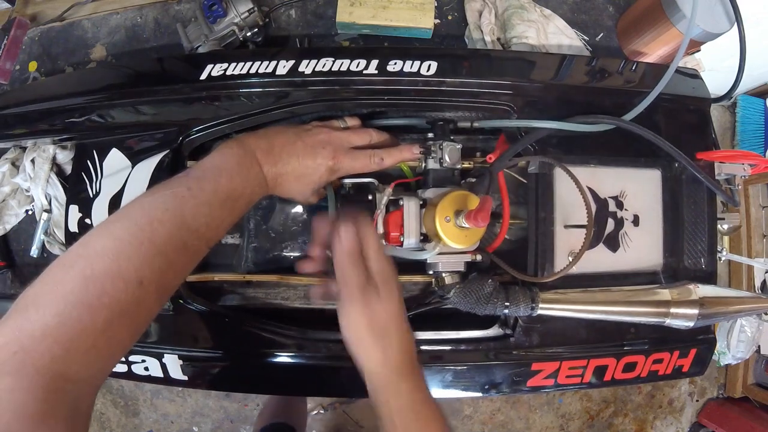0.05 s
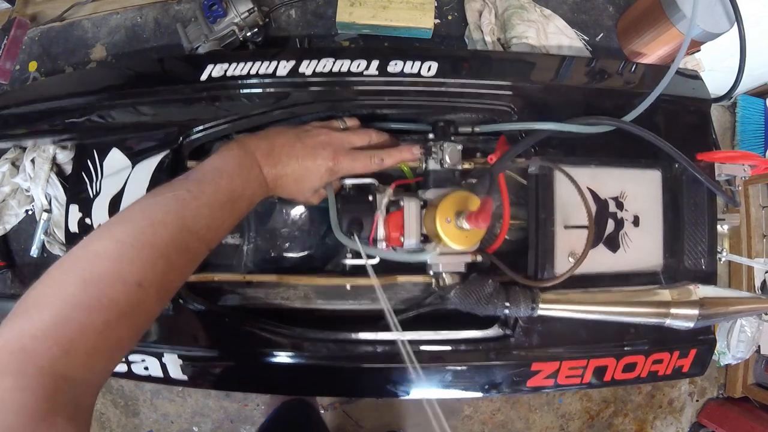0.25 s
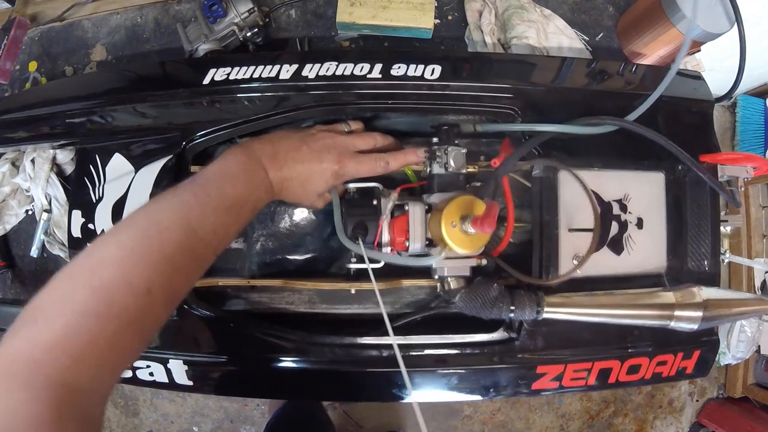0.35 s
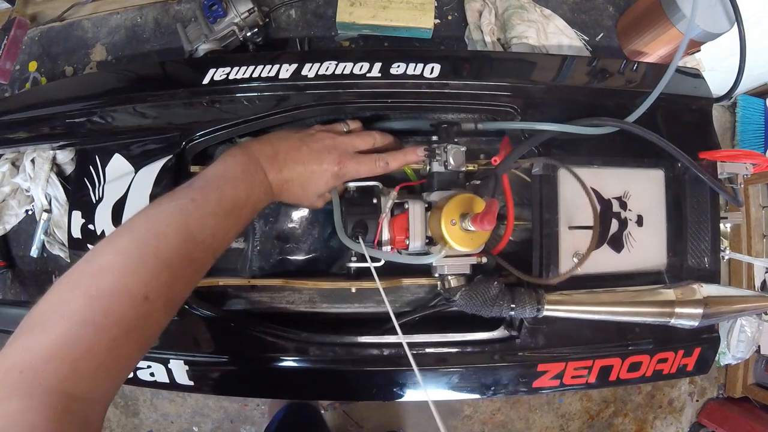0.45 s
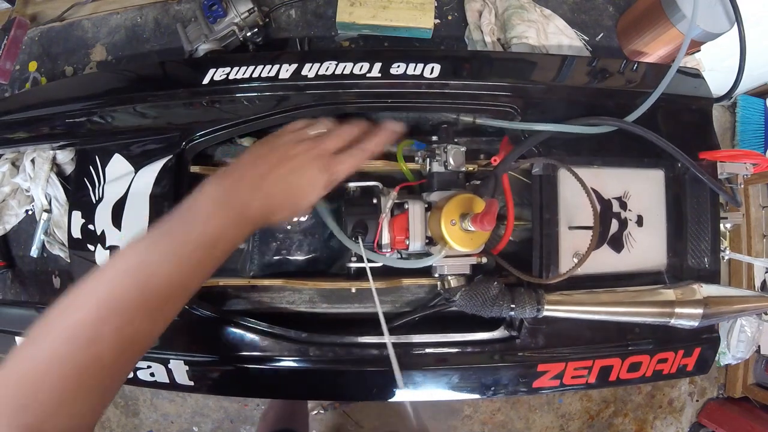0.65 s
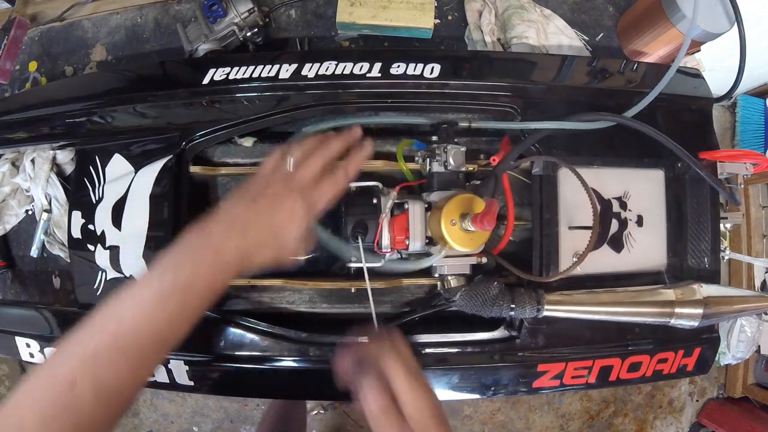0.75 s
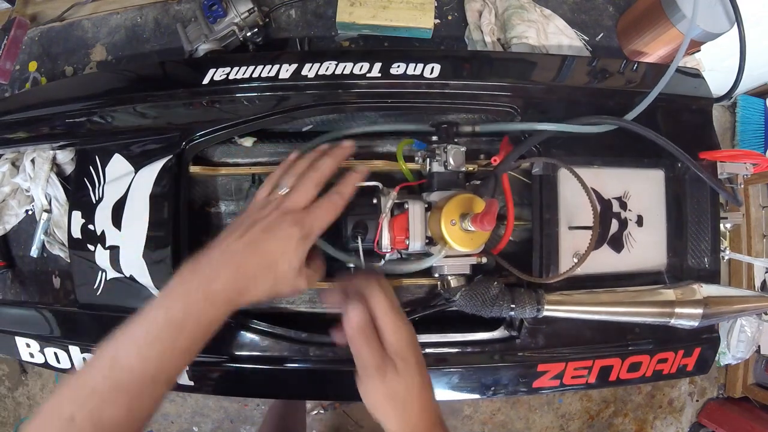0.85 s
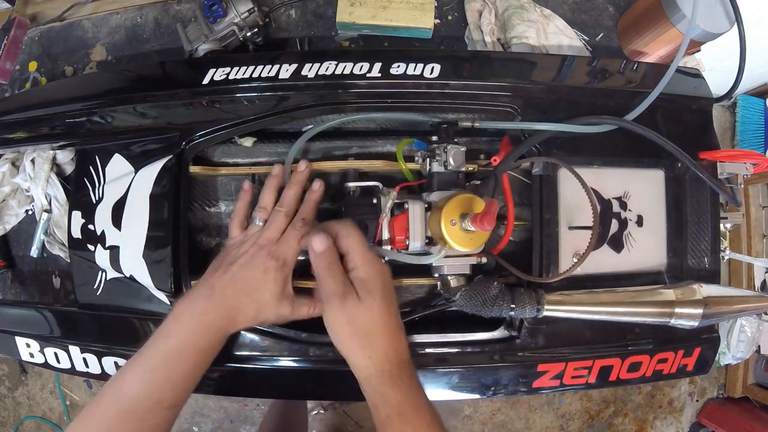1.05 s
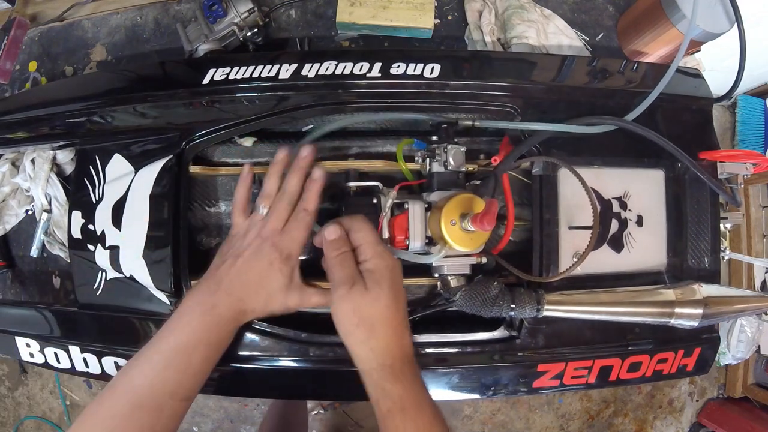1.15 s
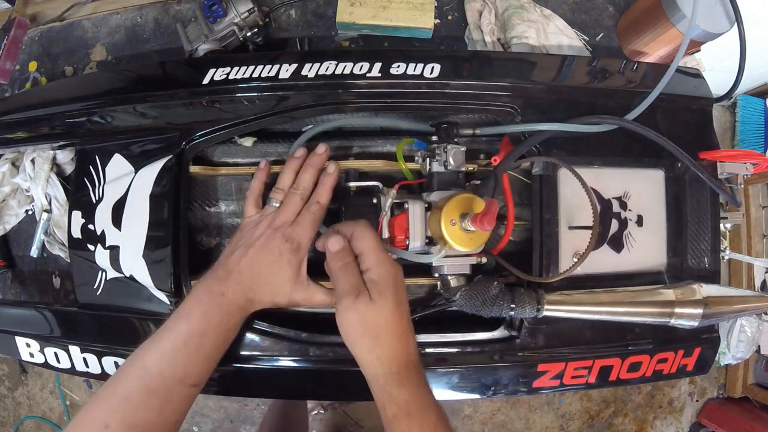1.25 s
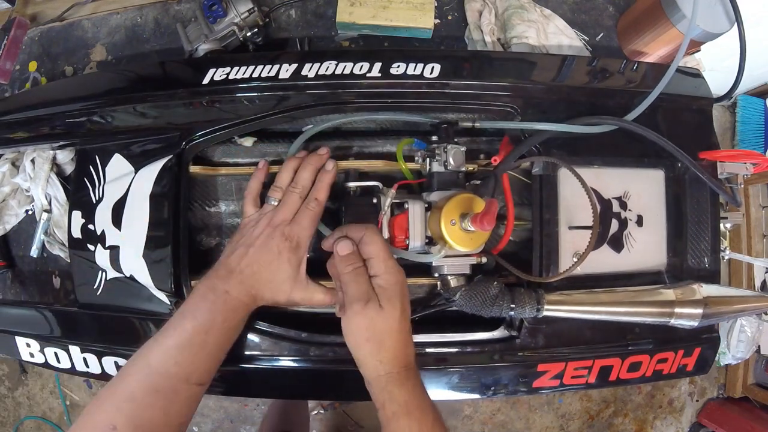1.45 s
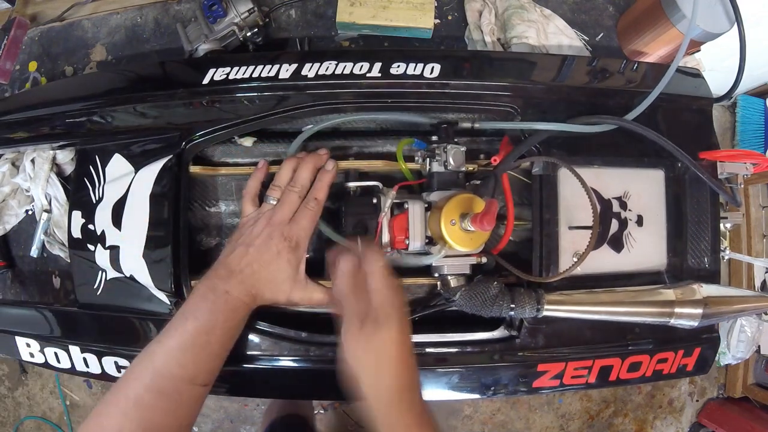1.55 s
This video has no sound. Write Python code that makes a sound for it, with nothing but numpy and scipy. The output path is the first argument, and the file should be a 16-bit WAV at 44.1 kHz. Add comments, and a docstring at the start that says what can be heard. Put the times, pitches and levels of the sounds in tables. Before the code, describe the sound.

One rattling pull of a model boat's starter cord, then ticking as it rewinds.

```python
"""Starter cord pull on a model boat.

A small two-stroke engine turns over once without firing. Compression strokes thump the hull, loose parts
rattle, the pawl ticks ever slower as the cord winds back, hands rub and knock. Mains hum and room rumble
stand behind. The camera housing rings near 6.5 kHz and sharpens every tick."""
import sys
import numpy as np
from scipy import signal
from scipy.fft import rfft, irfft
from scipy.io import wavfile
from scipy.ndimage import uniform_filter1d

SR = 44100
rng = np.random.default_rng(int(sys.argv[2]) if len(sys.argv) > 2 else 0)


def output_pcm(signal):
    """Save a mono or channel-first signal as 16-bit PCM at the path in sys.argv[1].

    Samples are clipped to [-1, 1] before scaling.
    """
    pcm = np.clip(np.atleast_2d(signal).T, -1, 1) * 32767
    wavfile.write(sys.argv[1], SR, np.round(pcm).astype(np.int16))


N = 70560
T = np.arange(N) / SR

# mains hum (time [s], level [dB])
HUM_LEVEL = [(0, -47), (.5, -46), (1.1, -45.5), (1.6, -43.5)]
# room noise spectrum (frequency [Hz], gain [dB])
ROOM_SPECTRUM = [(20, -1), (45, 8.5), (75, 0.5), (100, -3.5), (300, -13.5), (1000, -25.5), (3000, -28),
                 (4600, -51), (8000, -37), (12500, -39)]
# hands and cord sliding (time [s], level [dB])
RUSTLE_LEVEL = [(0, -50.5), (.03, -71), (.06, -62), (.08, -48.5), (.12, -70.5), (.17, -66), (.32, -49),
                (.5, -56), (.68, -60.5), (.8, -55.5), (.85, -66.5), (.97, -79), (1.0, -61.5), (1.03, -76),
                (1.11, -79), (1.145, -59), (1.165, -72), (1.19, -57), (1.225, -70.5), (1.255, -58.5),
                (1.29, -73.5), (1.6, -72)]
# sliding spectrum (frequency [Hz], gain [dB])
RUSTLE_SPECTRUM = [(200, 14), (600, 12), (1500, 8.5), (2700, 1.5), (4600, -3), (6400, -10), (9500, -3.5),
                   (12500, -48)]
# pawl ticks (time [s], level through housing [dB], scrape length [s])
PAWL_TICKS = [(0.024, -30.5, 0.02), (0.064, -31, 0.015), (0.083, -32, 0.0053), (0.153, -24, 0.0019),
              (0.164, -8.5, 0.0041), (0.204, -26, 0.0044), (0.248, -15.5, 0.0048), (0.254, -36, 0.0032),
              (0.28, -7, 0.0044), (0.294, -8, 0.0054), (.303, -11.5, 0.0037), (0.323, -10, 0.0047),
              (0.33, -4, 0.002), (0.338, -34, .004), (0.378, -33, 0.0037), (0.429, -23, 0.012),
              (.458, -19.5, 0.0052), (0.471, -23.5, 0.01), (0.485, -20.5, 0.0088), (0.4984, -13.5, 0.0015),
              (.515, -22, .003), (0.529, -20, 0.005), (.549, -15, 0.0025), (0.5677, -21.5, 0.0064),
              (0.59, -19, 0.0036), (0.61, -20, 0.004), (0.633, -20.5, 0.007), (.662, -22.5, 0.0082),
              (0.6924, -20.5, 0.0052), (0.7253, -24, 0.011), (0.761, -22.5, 0.0082), (0.782, -31, 0.0017),
              (0.8133, -22, 0.0057), (0.8778, -22.5, 0.0069), (0.884, -38, .002), (0.965, -39, .002),
              (1.252, -40, 0.0017), (1.594, -24, 0.0037)]
# tick spectrum (frequency [Hz], gain [dB])
TICK_SPECTRUM = [(300, 5.5), (1500, -0.5), (3500, 0), (4700, 1.5), (5700, -5.5), (6300, 6.5), (7200, -2.5),
                 (9300, 4.5), (10300, -7.5), (12500, -7.5)]
# hull resonances (frequency [Hz], width [Hz], gain [dB])
HULL_MODES = [(102, 120, -8), (160, 150, -1), (316, 53, 2.5), (401.6, 44.7, -2.5), (556, 34, -2.5),
              (656, 33.2, -2), (790, 26, -5.5), (869.2, 21, -2), (1046, 62, -9.5), (1253, 310, -19.5),
              (1970, 520, -23), (2670, 340, -22.5)]
# engine and hands knocking the hull (time [s], peak [dB], centre [Hz], width [Hz], decay [s])
HULL_KNOCKS = [(0.059, -46, 1300, 1450, 0.0096), (0.087, -44.5, 320, 300, 0.015),
               (0.171, -41, 580, 900, 0.0079), (0.22, -33.5, 247, 300, 0.018),
               (.245, -15.5, 833, 295, 0.0029), (.264, -13.5, 882, 202, 0.0033),
               (.298, -10.5, 891, 200, 0.0029), (.306, -17.5, 430, 200, 0.012),
               (.316, -10.5, 820, 250, 0.0066), (.322, -42, 680, 197, 0.0072), (.335, -20, 840, 300, 0.004),
               (0.505, -40, 278, 302, 0.057), (0.681, -28, 547, 490, 0.0052),
               (.684, -27, 1180, 900, 0.0033), (0.727, -37.5, 1120, 1200, 0.0081),
               (.762, -38.5, 297, 250, 0.019), (0.782, -41, 300, 250, 0.008), (0.82, -42, 350, 402, 0.013),
               (0.987, -39.5, 600, 900, 0.013), (.995, -50.5, 2550, 1500, 0.0091),
               (1.118, -37.5, 328, 600, 0.0083), (1.145, -41, 395, 905, 0.011),
               (1.183, -50, 1540, 1800, 0.0085), (1.247, -34.5, 304, 249, 0.022),
               (1.356, -42, 487, 300, 0.0028), (1.377, -49.5, 362, 149, 0.019),
               (1.594, -27, 510, 800, 0.0025)]
# shaking during the pull (time [s], hull level [dB], rattle level [dB])
SHAKE_LEVELS = [(.15, -41, -69), (.166, -55, -34.5), (.176, -42, -49), (.192, -62, -52.5), (.202, -41, -36),
                (.226, -45, -48.5), (.242, -27.5, -44), (.247, -20.5, -38.5), (.264, -20, -30.5),
                (.284, -19, -32), (.302, -14.5, -29), (.324, -12.5, -26.5), (.342, -16, -24),
                (.356, -21.5, -36), (.386, -21.5, -37.5), (.394, -21.5, -31.5), (.43, -29.5, -48.5),
                (.442, -38, -38.5), (.456, -42.5, -53), (.474, -39.5, -49), (.484, -54.5, -66),
                (.56, -53.5, -51)]
# loose metal spectrum (frequency [Hz], gain [dB])
RATTLE_SPECTRUM = [(1000, -1.5), (2600, 3.5), (4500, -7.5), (6400, -9), (9000, -2), (12500, -28)]
# compression strokes (time [s], peak [dB], pitch [Hz])
COMPRESSIONS = [(0.2, -13.5, 154.4), (0.256, -8.5, 144), (.274, -5, 154), (.291, -7.5, 165),
                (0.31, -14, 194), (0.331, -10.5, 157), (0.367, -13, 173), (.424, -20.5, 125),
                (0.44, -20, 290)]

HOUSING_HZ, HOUSING_WIDTH_HZ, HOUSING_DB = 6481, 444, 21.5


def undb(db):
    """dB to gain."""
    return 10 ** (np.asarray(db) / 20)


def curve(table, column=1):
    """Table column interpolated over time."""
    points = np.array(table)
    return np.interp(T, points[:, 0], points[:, column])


def unit_rms(x):
    """Scale to rms 1."""
    return x / np.sqrt(np.mean(x ** 2))


def colour(x, spectrum):
    """Filter by (frequency [Hz], gain [dB]) points on a log frequency axis."""
    hz, db = np.array(spectrum).T
    log_hz = np.log(np.fft.rfftfreq(N, 1 / SR) + 1)
    return irfft(rfft(x) * undb(np.interp(log_hz, np.log(hz), db)), N)


def ring(x, hz, width_hz, stages=1):
    """Resonators in series, gain 1 at the centre."""
    for _ in range(stages):
        x = signal.lfilter(*signal.iirpeak(hz, hz / width_hz, SR), x)
    return x


def grains(per_s, spread_db):
    """Random impulses of uneven size."""
    chance, polarity, size = rng.random((N, 3)).T
    return (chance < per_s / SR) * np.sign(polarity - .5) * undb(-spread_db * np.log(size + 1e-9))


def wander(rate_hz):
    """Slow random drift, rms 1."""
    window = int(SR / rate_hz)
    return unit_rms(uniform_filter1d(uniform_filter1d(rng.standard_normal(N), window), window))


def mains_hum(hz=121.2):
    """Sine wavering slightly in level and phase."""
    rms = undb(curve(HUM_LEVEL) + 0.42 * wander(19))
    return np.sqrt(2) * rms * np.sin(2 * np.pi * hz * T + 0.047 * wander(14))


def room_rumble(level_db=-52.5):
    """Steady low noise with faint air."""
    return undb(level_db) * unit_rms(colour(rng.standard_normal(N), ROOM_SPECTRUM))


def cord_rustle():
    """Faint, uneven friction of hands and cord."""
    rub = colour(rng.standard_normal(N), RUSTLE_SPECTRUM)
    midband_rms = np.std(ring(rub, hz=2340, width_hz=3000))
    return rub / midband_rms * undb(curve(RUSTLE_LEVEL) + 0.68 * wander(45))


def pawl_ticks(rise_s=0.0015, snap_db=12.5, tail_db=-12, tail_t60_s=0.19):
    """Each pawl contact: a snap, a short gritty scrape, a faint tail."""
    power, snaps = np.zeros(N), np.zeros(N)
    grit = grains(per_s=7000, spread_db=2.5)
    for start_s, level_db, scrape_s in PAWL_TICKS:
        t = np.maximum(T - start_s, 0)
        dry_db = level_db - HOUSING_DB
        scrape = np.exp(-(t / scrape_s) ** 2)
        tail = undb(tail_db - 60 * t / tail_t60_s)
        shape = np.minimum(t / rise_s, 1) * (scrape + tail) ** 2
        grit_power = np.sum(shape * grit ** 2) / shape.sum()
        power += undb(dry_db) ** 2 * shape / grit_power
        snaps[int(start_s * SR)] = undb(dry_db + snap_db)
    return colour(grit * np.sqrt(power) + snaps, TICK_SPECTRUM)


def hull(force):
    """Hollow hull's response: parallel modes of alternating sign."""
    return sum((-1) ** k * undb(db) * ring(force, hz, width_hz)
               for k, (hz, width_hz, db) in enumerate(HULL_MODES))


def hull_knocks(edge_db=12):
    """A sharp edge, then a short rub; each contact spot rings a different band of the hull."""
    out, grit = np.zeros(N), rng.standard_normal(N)
    for start_s, peak_db, hz, width_hz, decay_s in HULL_KNOCKS:
        t = np.maximum(T - start_s, 0)
        force = grit * (T >= start_s) * np.exp(-t / decay_s)
        force[int(start_s * SR)] = undb(edge_db)
        knock = hull(ring(force, hz, width_hz, stages=2))
        out += undb(peak_db) * knock / np.abs(knock).max()
    return out


def bench(force):
    """Low resonance of the bench under the hull."""
    return ring(force, hz=56.3, width_hz=40, stages=2)


def hull_shake(bench_db=-16, fade_in_s=0.005, fade_out_s=0.03):
    """Dense blows ring hull and bench while loose metal rattles."""
    start_s, end_s = SHAKE_LEVELS[0][0], SHAKE_LEVELS[-1][0]
    gate = np.clip((T - start_s) / fade_in_s, 0, 1) * np.clip((end_s - T) / fade_out_s, 0, 1)
    blows = grains(per_s=4000, spread_db=1.5)
    force = blows * gate * undb(curve(SHAKE_LEVELS))
    body = hull(force) / np.std(hull(blows))
    boom = undb(bench_db) * bench(force) / np.std(bench(blows))
    rattle = unit_rms(colour(grains(per_s=4000, spread_db=2.5), RATTLE_SPECTRUM))
    return body + boom + rattle * gate * undb(curve(SHAKE_LEVELS, column=2))


def compression_strokes(rise_s=0.0074, t60_s=0.021):
    """One short, dull thump per compression."""
    out = np.zeros(N)
    for start_s, peak_db, hz in COMPRESSIONS:
        t = np.maximum(T - start_s, 0)
        envelope = (1 - np.exp(-t / rise_s)) ** 2 * undb(-60 * t / t60_s)
        thump = -np.sin(2 * np.pi * hz * t) * envelope
        out += undb(peak_db) * thump / np.abs(thump).max()
    return out


def pawl_ping(start_s=0.2015, peak_db=-25.5, hz=7820, t60_s=0.016):
    """The pawl rings as it bites."""
    t = np.maximum(T - start_s, 0)
    return undb(peak_db - 60 * t / t60_s) * np.sin(2 * np.pi * hz * t)


def scene():
    """All sources, mono."""
    background = mains_hum() + room_rumble()
    pull = cord_rustle() + hull_shake() + compression_strokes()
    contacts = pawl_ticks() + hull_knocks() + pawl_ping()
    return (background + pull + contacts)[None]


def record(dry):
    """Housing resonance lifts the treble; soft clip, then low-pass."""
    limit, cutoff_hz = 0.65, 12100
    housing = ring(dry, HOUSING_HZ, HOUSING_WIDTH_HZ)
    housing = ring(housing, HOUSING_HZ, 9.7 * HOUSING_WIDTH_HZ)  # steeper skirts
    clipped = limit * np.tanh((dry + undb(HOUSING_DB) * housing) / limit)
    lowpass = signal.ellip(8, .2, 60, cutoff_hz, fs=SR, output="sos")
    return signal.sosfilt(lowpass, clipped)


dry = scene()
out = record(dry)
output_pcm(out)
```